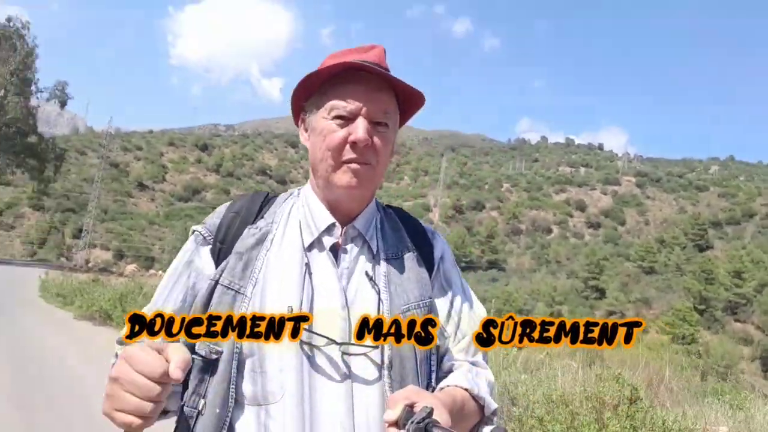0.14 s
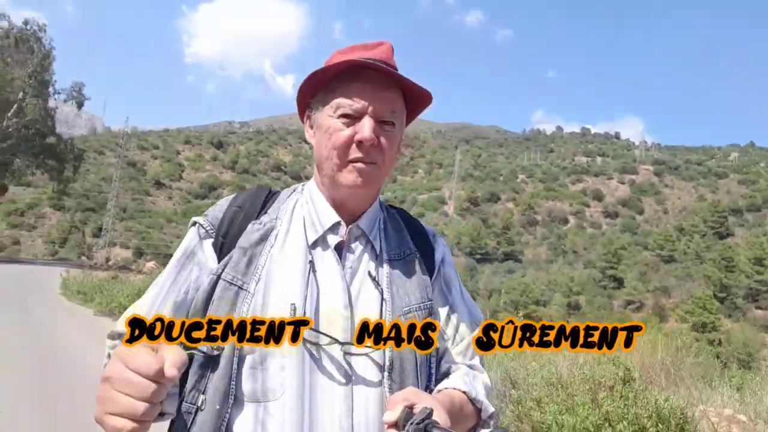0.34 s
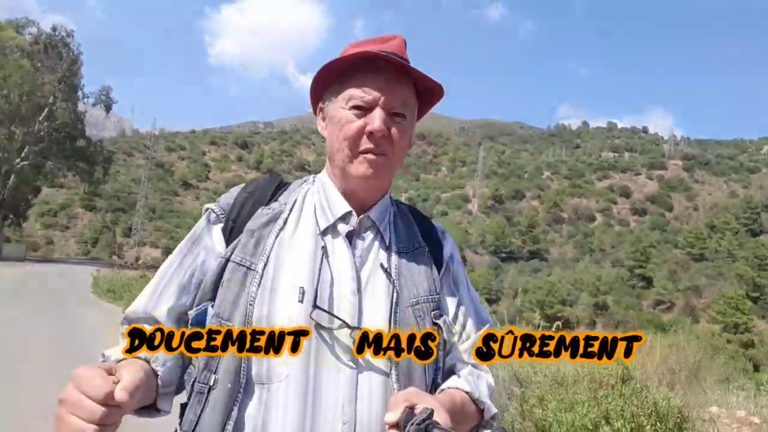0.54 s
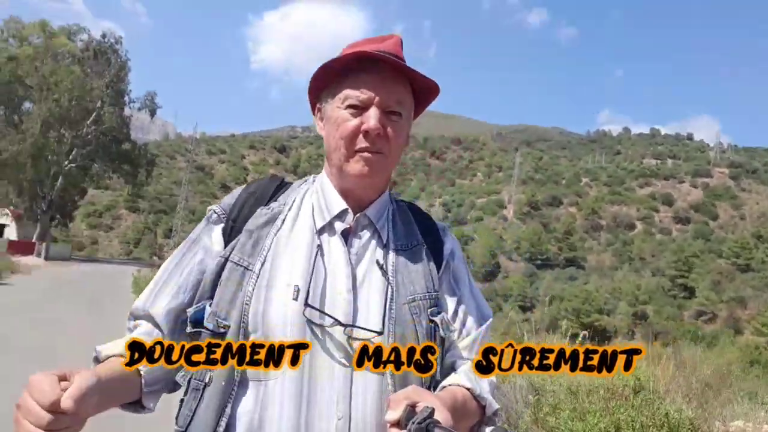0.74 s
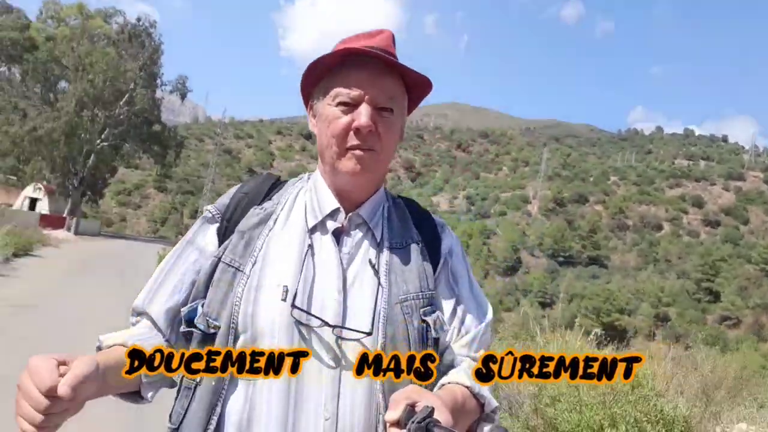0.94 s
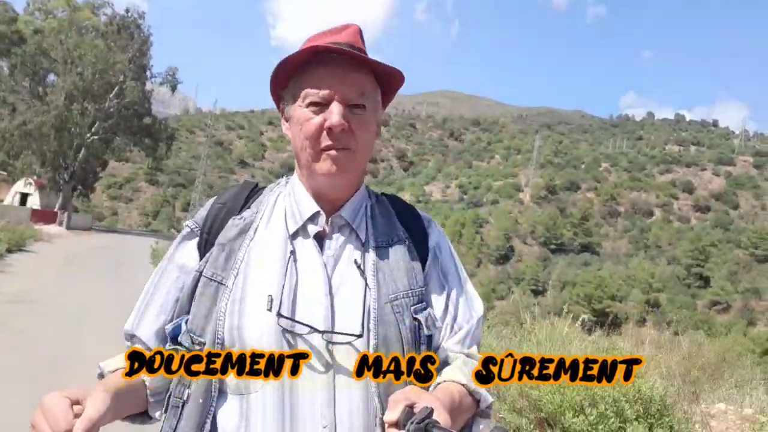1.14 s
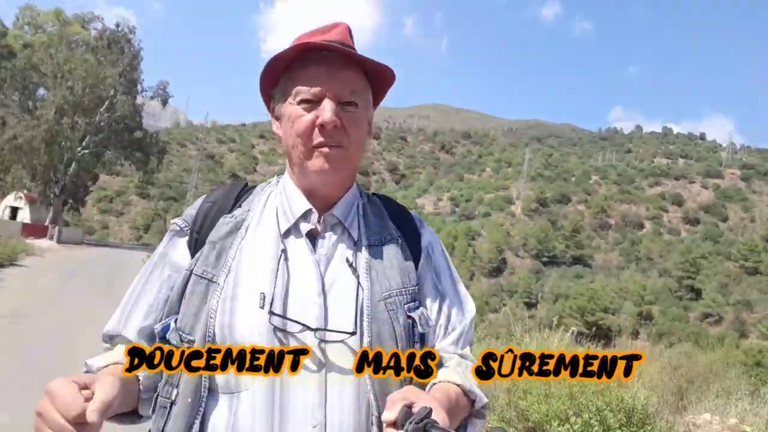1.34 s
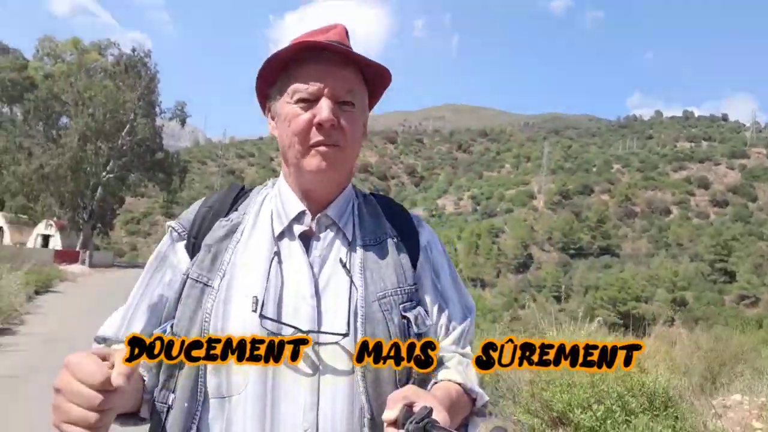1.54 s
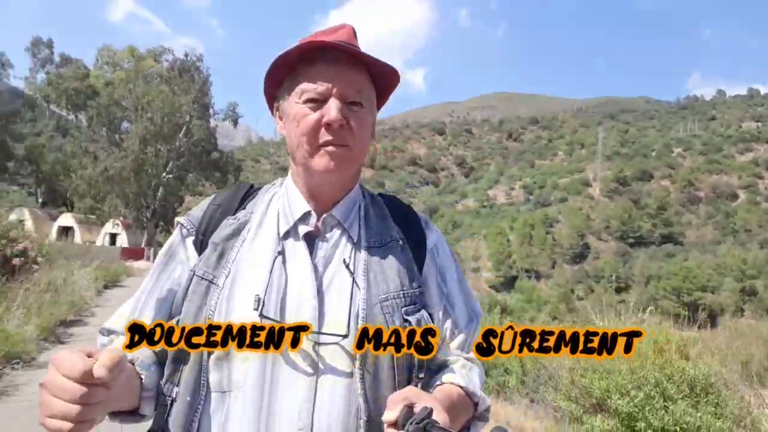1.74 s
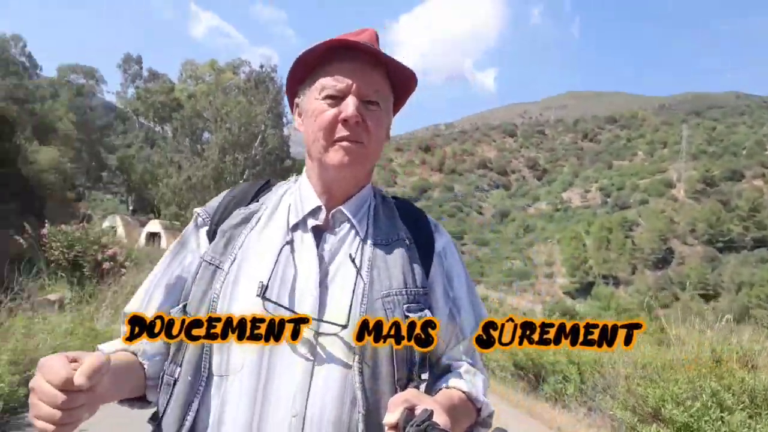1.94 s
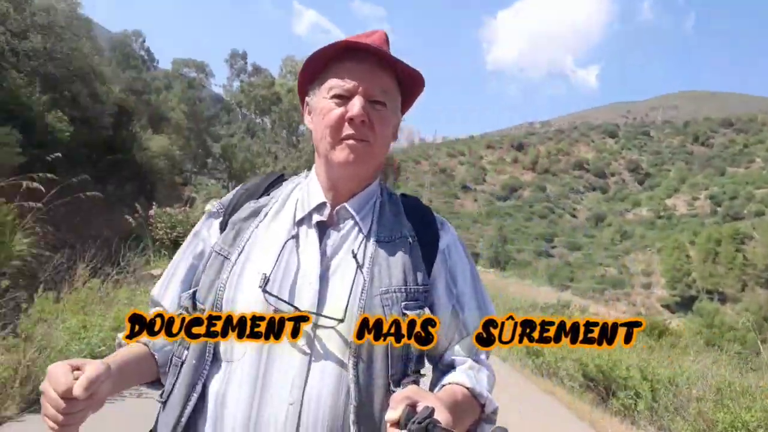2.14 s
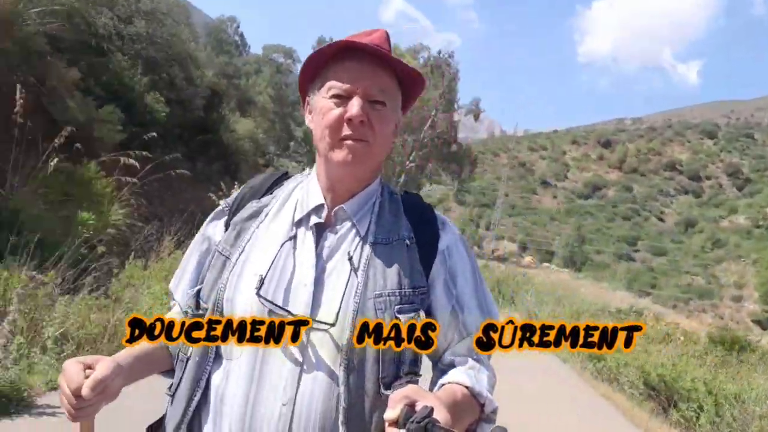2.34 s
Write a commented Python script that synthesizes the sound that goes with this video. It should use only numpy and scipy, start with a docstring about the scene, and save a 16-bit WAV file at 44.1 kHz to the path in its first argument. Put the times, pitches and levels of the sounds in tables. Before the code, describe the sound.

Outdoors, two sharp taps of a walking stick land on pavement about a second apart, near the microphone. Quiet steps, low puffs of wind, a hum like a far engine and a few distant birds surround them.

```python
"""A walking stick taps a paved mountain road close to the microphone: each tap is a quick run of
contacts that crack, crunch grit and excite the damped modes of the shaft. Soft footsteps, a dull rebound
of the stick, tiny ticks, rustling cloth and two lighter knocks fall around the taps; the roadside
scatters a faint echo. Turbulent puffs of wind thump the microphone ports. Beneath lie a low hum,
like a far engine, a faint hiss and a few distant bird chirps."""
import sys
import numpy as np
from scipy import signal
from scipy.fft import rfft, irfft, next_fast_len
from scipy.io import wavfile
from scipy.ndimage import map_coordinates

SR = 44100
rng = np.random.default_rng(int(sys.argv[2]) if len(sys.argv) > 2 else 0)


def output_pcm(signal):
    """Save a mono or channel-first signal as 16-bit PCM at the path in sys.argv[1].

    Samples are clipped to [-1, 1] before scaling.
    """
    pcm = np.clip(np.atleast_2d(signal).T, -1, 1) * 32767
    wavfile.write(sys.argv[1], SR, np.round(pcm).astype(np.int16))


N = 110250

# Harmonics of the hum. Each row: multiple of the fundamental, level in dB.
HUM_HARMONICS = [(1, -43), (2, -66), (4, -68.5)]
# Swell of the hum. Each row: time in seconds, gain in dB.
HUM_SWELL = [(0, -2.5), (0.401, 4.5), (1.0, -0.5), (1.6, -7), (1.9, 3.5), (2.2, -1.5)]
# Strength of the hiss: left level in dB, right level in dB.
HISS_PORTS_DB = [-72, -70]
# Spectra of the noises and clicks. Each row: frequency in Hz, relative level in dB.
HISS_SPECTRUM = [(200, -55), (700, -20.5), (1500, -0.5), (2800, -4), (4200, -2.5), (6200, 2), (8000, -9.5),
                 (10000, -6), (12500, -1), (15500, -1.5)]
RUMBLE_SPECTRUM = [(25, -15.5), (48, 6), (70, 4.5), (110, -5.5), (180, -17.5), (260, -17.5), (305, -16),
                   (380, -25.5), (600, -36), (1500, -46), (5000, -62.5)]
PUFF_SPECTRUM = [(20, -27), (45, -20.5), (70, 4), (100, 3), (130, -2), (180, -17), (260, -26.5), (400, -40),
                 (4000, -100)]
CLOTH_SPECTRUM = [(1500, -33.5), (3200, 10.5), (4500, 13.5), (6200, 6.5), (8000, -30.5), (15000, -38.5)]
SCUFF_SPECTRUM = [(100, -33.5), (260, 8), (600, -4.5), (900, -4.5), (1250, -12), (1800, -11.5),
                  (2400, -18.5), (3500, -23), (5800, -19), (8500, -34), (15000, -37)]
GRIT_SPECTRUM = [(120, -43), (380, -5.5), (1000, -2.5), (1550, 6.5), (2200, -0.5), (3600, -7.5),
                 (5000, -12.5), (6800, -9.5), (8000, -34.5), (11000, -37), (15500, -48)]
BUCKLE_SPECTRUM = [(2000, -45), (5600, -9), (6700, -19), (7700, 8), (9000, -15), (15000, -7.5)]
# Puffs of wind. Each row: centre in seconds, Gaussian half width in seconds, left level in dB,
# right level in dB, eddy size as a ratio.
WIND_PUFFS = [(0.061, 0.038, -37, -50, 1.16), (0.284, 0.013, -52, -27.5, 1.19),
              (0.363, 0.029, -45.5, -33.5, 1.11), (0.468, 0.018, -18.5, -28.5, 1.044),
              (0.581, 0.018, -31.5, -43, 0.98), (0.671, 0.043, -31.5, -33, 1.15),
              (0.898, 0.078, -41.5, -43, 0.93), (1.086, 0.011, -25.5, -38.5, 1.22),
              (1.234, 0.038, -46, -35.5, 1.46), (1.323, 0.026, -28.5, -68, 0.95),
              (1.445, 0.02, -29, -53, 0.73), (1.531, 0.046, -35.5, -37.5, 1.16),
              (1.729, 0.0086, -29.5, -43, 0.72), (1.887, 0.0053, -21, -36, 1.02),
              (1.975, 0.043, -32.5, -54, 1.01)]
# Swell of the rustle. Each row: time in seconds, level in dB.
CLOTH_SWELL = [(0, -76.5), (.8, -87), (.97, -80), (1.451, -82), (1.681, -79), (1.85, -75.5), (2.249, -100),
               (2.42, -79.5)]
# Bird chirps. Each row: start and length in seconds, first, middle and last pitch in Hz, level in dB.
BIRD_CHIRPS = [(0, 0.02, 3050, 2980, 2750, -73), (0.016, 0.04, 5900, 3730, 3560, -66),
               (0.083, 0.05, 3114, 3010, 2670, -78), (0.599, 0.019, 4000, 3710, 3500, -72.5),
               (0.967, 0.082, 2800, 3335, 4380, -66.5), (1.124, 0.075, 4500, 5120, 4660, -73),
               (1.503, 0.047, 3220, 3570, 4660, -68), (2.406, 0.05, 3100, 3620, 4670, -67)]
# Reverberation of the roadside. Each row: frequency in Hz, t60 (time to fall 60 dB) in seconds.
ROADSIDE_DECAY = [(200, 1), (1000, 0.34), (3000, 0.34), (7000, 0.28), (14000, 0.06)]
# Footfalls and, second in the list, the stick's dull rebound. Each row: start in seconds, scuff level
# in dB, scuff t60 in seconds, click level in dB, knock level in dB, knock frequency in Hz.
STEPS_AND_REBOUND = [(.365, -65, 0.53, -54.5, -60, 1002), (.5365, -49.5, 0.056, -62, -41, 770),
                     (.959, -54.5, 0.079, -64, -69, 800), (1.181, -65.5, 0.086, -38.5, -41, 293.5),
                     (1.190, -52, 0.049, -55.5, -55, 950), (1.859, -55.5, 0.038, -55, -52, 970),
                     (1.908, -56, 0.061, -55, -53, 730), (1.9195, -43, 0.028, -44, -40.5, 843),
                     (2.085, -63, 0.093, -68, -58, 960)]
# Contacts of the tip with the road, and lighter knocks as of the handle. Each row: start in seconds,
# level in dB, brightness in dB per octave, relative grit level in dB, relative crack level in dB.
TIP_CONTACTS = [(0.4773, -18.5, 1.5, 1, -6), (.4838, -33.5, 6.5, 0.5, -9.5), (0.4873, -22.5, -2.5, 5, 1.5),
                (1.7608, -33.5, 5, 10, 11), (1.7622, -23, 0.5, -5.5, -7.5), (1.7747, -21, 1.5, 0, -6),
                (1.7845, -33.5, 4, -3, -29)]
HANDLE_CONTACTS = [(2.4447, -49, -5, 4.5, -27), (2.4772, -33, 0, -9.5, -1)]
# Modes that these excite. Each row: nominal frequency in Hz, relative level in dB, t60 in seconds.
SHAFT_MODES = [(303, -11, .054), (505, -15, .06), (783, -8, .055), (1265, 1, .028), (1570, -6, .035),
               (1930, -10, .018), (2438, -10, .043), (2880, -11, .03), (3360, -13, .032), (4300, -17, .024),
               (6480, -25, .024), (3825, -6, .028), (4820, -10, .017), (5400, -18, .022)]
HANDLE_MODES = [(372, -11.5, 0.059), (617, -3, 0.05), (917, 1, 0.066), (1160, 10.5, 0.0092),
                (1590, -10, 0.075), (2820, -12, 0.022), (3300, -31.5, 0.017), (3840, -18, 0.029),
                (5330, -19, 0.034)]
# Firmness of the hand. Each row: time in seconds, frequency ratio of the lowest shaft modes.
GRIP_FIRMNESS = [(.48, 1.031), (1.76, 1.11)]
# Balance of the stick between the ports. Each row: frequency in Hz, left minus right in dB.
STICK_BALANCE = [(300, -1), (1000, 0.5), (1600, 1), (3500, 0), (6000, -3.5), (7300, 2.5), (12000, 12)]
# Tiny dry ticks, as of a buckle. Each row: start in seconds, peak level in dB.
BUCKLE_TICKS = [(0.7616, -46.5), (2.215, -62)]

HUM_HZ, HUM_DRIFT = 77.7, 0.00688
RUMBLE_DB, RUMBLE_SWING_DB, PUFF_STEADY_S = -46, 2, 0.028
KNOCK_RISE_S, KNOCK_T60_S, CLICK_DB_PER_OCTAVE = 0.00085, 0.013, -4
GRIT_T60_S, TREBLE_T60_S, TREBLE_HZ = 0.036, 0.019, 4200
GRIT_CLUMP_DB, GRIT_WIDTH = 5.5, 0.35  # unevenness of the grains; gain of the side signal
IMPACT_RISE_S, GRIP_BELOW_HZ, PORT_LAG_S = 0.00046, 650, 0.00024
TIP_ECHO_DB, KNOCK_ECHO_DB, BIRD_ECHO_DB = -26, -7, -5
LOW_CUT_HZ, TOP_HZ = 25.6, 15850


def amp(db):
    """Amplitude ratio of a level in decibels."""
    return 10 ** (np.asarray(db) / 20)


def unit(x):
    """Normalisation to rms 1."""
    return x / np.sqrt(np.mean(x ** 2) + 1e-20)


def along(points, hz):
    """Interpolation of (Hz, value) points on a logarithmic frequency axis."""
    knots_hz, values = np.transpose(points)
    return np.interp(np.log(hz + 1), np.log(knots_hz + 1), values)


def wobble(rate):
    """Slow random modulation: a spline through rate knots a second."""
    return map_coordinates(rng.standard_normal(200), [np.arange(N) * rate / SR], mode="wrap")


def filtered(x, response):
    """Linear filtering: the spectrum of x times a frequency response."""
    n = x.shape[-1]
    size = next_fast_len(n + 8192)
    return irfft(rfft(x, size) * response(np.fft.rfftfreq(size, 1 / SR)), size)[..., :n]


def tilt(hz, slope_db):
    """Spectral tilt: the gain of a slope in dB per octave about 1500 Hz."""
    return amp(slope_db * np.log2(np.clip(hz, 250, 8000) / 1500))


def noise(spectrum, shape):
    """Spectral shaping of white noise, at rms 1."""
    return unit(filtered(rng.standard_normal(shape), lambda hz: amp(along(spectrum, hz))))


def click(spectrum, n, slope_db):
    """Minimum-phase impulse response of a tilted spectrum, at peak 1."""
    hz = np.fft.rfftfreq(4096, 1 / SR)
    cepstrum = irfft(np.log(amp(along(spectrum, hz)) * tilt(hz, slope_db)))
    causal = np.r_[cepstrum[0], 2 * cepstrum[1:len(cepstrum) // 2]]
    pulse = irfft(np.exp(rfft(causal, len(cepstrum))))
    return np.pad(pulse, (0, n))[:n] / np.abs(pulse).max()


def add(track, start, sound):
    """Superposition of a sound on a track, from start in seconds."""
    part = track[max(round(start * SR), 0):][:len(sound)]
    part += sound[:len(part)]


def hum():
    """Harmonic series: a low fundamental and weak overtones waver in pitch and level."""
    phase = 2 * np.pi * np.cumsum(HUM_HZ * (1 + HUM_DRIFT * wobble(3.37))) / SR
    tone = sum(np.sqrt(2) * amp(db + wobble(5.7)) * np.sin(round(k) * phase) for k, db in HUM_HARMONICS)
    swell_db = np.interp(np.arange(N) / SR, *np.transpose(HUM_SWELL))
    return tone * amp(swell_db) * amp([[-2], [2]])


def hiss():
    """Stationary noise, uncorrelated between left and right."""
    return amp(HISS_PORTS_DB)[:, None] * noise(HISS_SPECTRUM, (2, N))


def wind():
    """Turbulence: over a rumble, puffs buffet each port separately; smaller eddies sound higher."""
    out = amp(RUMBLE_DB + RUMBLE_SWING_DB * wobble(12)) * noise(RUMBLE_SPECTRUM, (2, N))
    t = np.arange(-SR // 5, SR // 5) / SR
    window = signal.windows.hann(int(2 * PUFF_STEADY_S * SR))
    for centre, half_width, left_db, right_db, eddy_size in WIND_PUFFS:
        eddies = noise([(hz / eddy_size, db) for hz, db in PUFF_SPECTRUM], (2, len(t)))
        power = np.abs(signal.fftconvolve(eddies ** 2, window[None] / window.sum(), "same"))
        steady = eddies / np.sqrt(power + .01)
        puff = amp([[left_db], [right_db]]) * np.exp(-.5 * (t / half_width) ** 2) * steady
        for port, sound in zip(out, puff):
            add(port, centre + t[0], sound[centre + t >= 0])
    return out


def rustle():
    """Friction noise: brushing cloth swells and fades."""
    level_db = np.interp(np.arange(N) / SR, *np.transpose(CLOTH_SWELL))
    return amp(level_db + 0.53 * wobble(35)) * noise(CLOTH_SPECTRUM, (2, N)) * amp([[-2.5], [2.5]])


def birds():
    """Frequency modulation: each distant whistle glides through three pitches with a slight warble."""
    out = np.zeros(N)
    for start, length, first_hz, middle_hz, last_hz, db in BIRD_CHIRPS:
        progress = np.linspace(0, 1, int(length * SR))
        period_curve = np.polyfit([0, .5, 1], [1 / first_hz, 1 / middle_hz, 1 / last_hz], 2)
        warble = 1 + .018 * wobble(500)[:len(progress)]
        hz = warble / np.polyval(period_curve, progress)
        envelope = np.sqrt(np.abs(np.sin(np.pi * progress ** 1.25)))
        add(out, start, amp(db) * envelope * np.sin(2 * np.pi * np.cumsum(hz) / SR))
    return out


def roadside(x):
    """Diffuse reflection: bank and bushes return a tail whose treble dies first."""
    hz, t, spectra = signal.stft(rng.standard_normal((2, SR // 2)), SR, nperseg=256)
    decay = amp(-60 * t / along(ROADSIDE_DECAY, hz)[:, None])
    tail = signal.istft(spectra * decay, SR, nperseg=256)[1]
    return signal.fftconvolve(x[None], tail / np.linalg.norm(tail[0]), axes=1)[:, :N]


def steps_and_rebound():
    """Impact and friction: footfalls and the stick's dull rebound knock, click and scuff on the road."""
    out, t = np.zeros(N), np.arange(SR // 4) / SR
    onset = 1 - np.exp(-t / KNOCK_RISE_S)
    for start, scuff_db, t60, click_db, knock_db, knock_hz in STEPS_AND_REBOUND:
        scuff = amp(scuff_db - 60 * t / t60) * noise(SCUFF_SPECTRUM, len(t))
        knock = amp(knock_db - 60 * t / KNOCK_T60_S) * np.sin(2 * np.pi * knock_hz * t)
        pulse = amp(click_db) * click(SCUFF_SPECTRUM, len(t), CLICK_DB_PER_OCTAVE)
        add(out, start, (scuff + knock) * onset + pulse)
    return out


def grit(n, brightness):
    """Granular noise, as mid and side: uneven grains merge into a crunch whose treble dies first."""
    t = np.arange(n) / SR
    grains = rng.standard_normal((2, n)) * amp(GRIT_CLUMP_DB * rng.standard_normal(n))
    pulse = click(GRIT_SPECTRUM, n, brightness)
    crunch = unit(signal.fftconvolve(grains, pulse[None], axes=1)[:, :n])
    body = filtered(crunch, lambda hz: 1 / (1 + (hz / TREBLE_HZ) ** 8))
    return body * amp(-60 * t / GRIT_T60_S) + (crunch - body) * amp(-60 * t / TREBLE_T60_S)


def impact(contact, modes):
    """Impulsive excitation: one contact cracks, crunches grit and sets damped modes ringing."""
    start, db, brightness, grit_db, crack_db = contact
    out, t = np.zeros((2, N)), np.arange(SR // 5) / SR
    ring = np.zeros(len(t))
    for hz, mode_db, t60 in modes:
        envelope = amp(mode_db + rng.normal(0, 1) - 60 * t / t60)
        ring += envelope * tilt(hz, brightness) * np.sin(2 * np.pi * hz * t)
    crack = amp(crack_db) * click(GRIT_SPECTRUM, len(t), brightness)
    mid, side = amp(grit_db) * grit(len(t), brightness)
    onset = 1 - np.exp(-t / IMPACT_RISE_S)
    for port, sign in zip(out, (1, -1)):
        add(port, start, amp(db) * (crack + (ring + mid + sign * GRIT_WIDTH * side) * onset))
    return out


def stick_tap(contact):
    """Modal vibration: the tip rings the shaft, and a firmer grip raises its lowest modes."""
    grip = np.interp(contact[0], *np.transpose(GRIP_FIRMNESS))
    modes = [(hz * grip if hz < GRIP_BELOW_HZ else hz, db, t60) for hz, db, t60 in SHAFT_MODES]
    return impact(contact, modes)


def from_left(x):
    """Path difference: the stick reaches the left port first, and each port colours it."""
    sides = np.array([[.5], [-.5]])

    def response(hz):
        return amp(sides * along(STICK_BALANCE, hz)) * np.exp(2j * np.pi * hz * sides * PORT_LAG_S)
    return filtered(x, response)


def buckle_ticks():
    """Brief transients: a small buckle on the clothes clicks with the stride."""
    out = np.zeros(N)
    for start, db in BUCKLE_TICKS:
        add(out, start, amp(db) * click(BUCKLE_SPECTRUM, SR // 20, slope_db=0))
    return out


def handle_knocks():
    """Modal vibration: lighter blows, as of the handle, ring a second set of modes."""
    return sum(impact(contact, HANDLE_MODES) for contact in HANDLE_CONTACTS)


def scene():
    """Superposition of the direct sounds and the roadside echoes of taps, steps, rebound and birds."""
    stick = sum(stick_tap(contact) for contact in TIP_CONTACTS) + handle_knocks()
    road_knocks, chirps = steps_and_rebound(), birds()
    # Of each tap, only the crack and the grit carry to the roadside.
    tip_echo = sum(roadside(impact(contact, modes=[]).mean(0)) for contact in TIP_CONTACTS)
    near = from_left(stick) + road_knocks * amp([[-1.5], [1.5]]) + buckle_ticks() + rustle()
    echoes = amp(TIP_ECHO_DB) * tip_echo + amp(KNOCK_ECHO_DB) * roadside(road_knocks)
    echoes += amp(BIRD_ECHO_DB) * roadside(chirps)
    return near + chirps + echoes + wind() + hum() + hiss()


def record(dry):
    """Band limiting: the recorder sheds the deepest bass and the highest treble."""
    low_cut = signal.butter(2, LOW_CUT_HZ, "high", fs=SR, output="sos")
    return filtered(signal.sosfilt(low_cut, dry), lambda hz: hz < TOP_HZ)


dry = scene()
out = record(dry)
output_pcm(out)
```